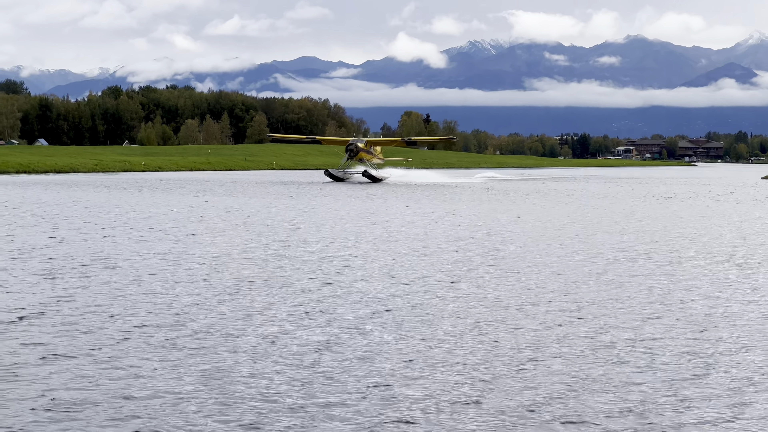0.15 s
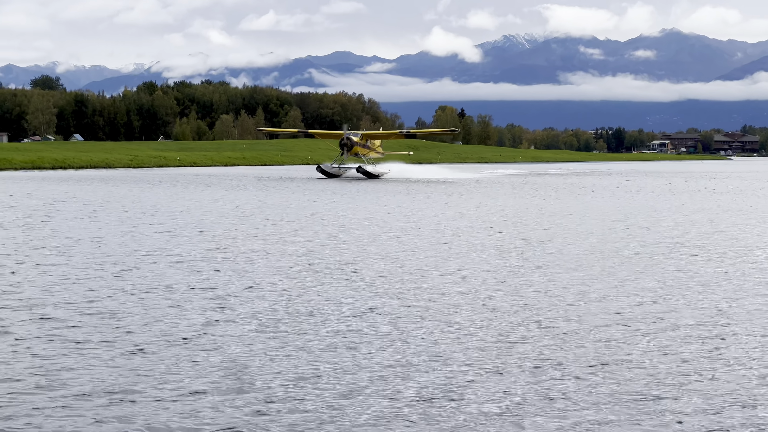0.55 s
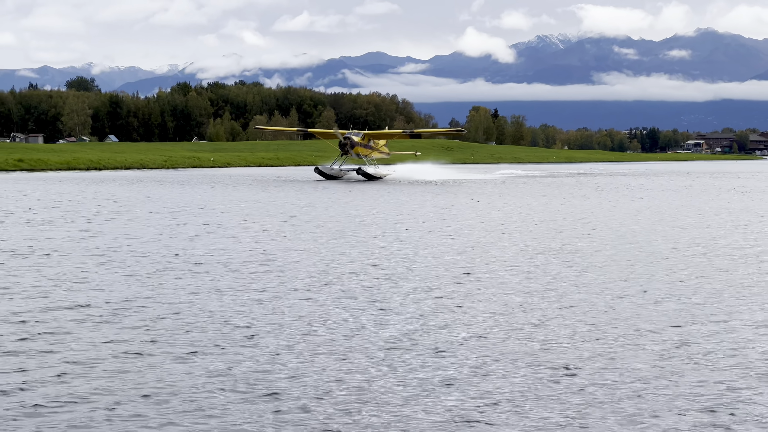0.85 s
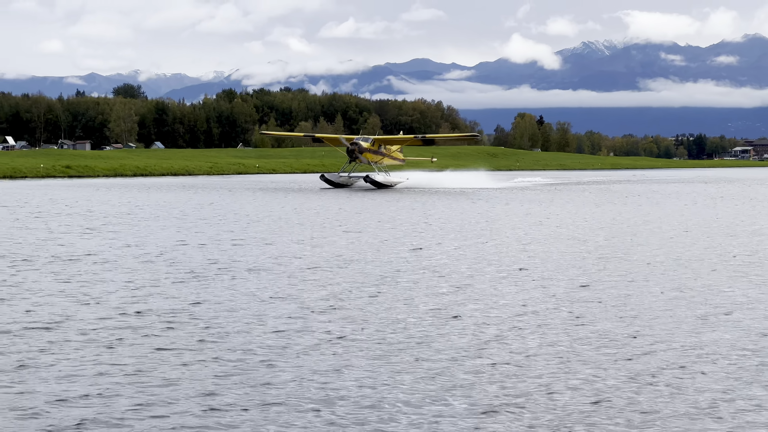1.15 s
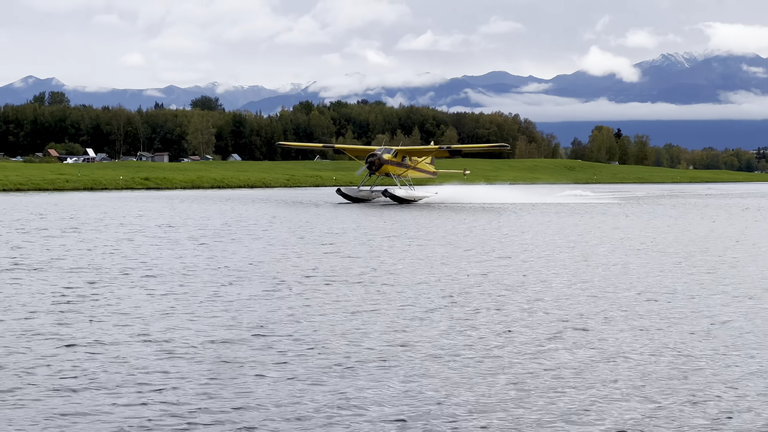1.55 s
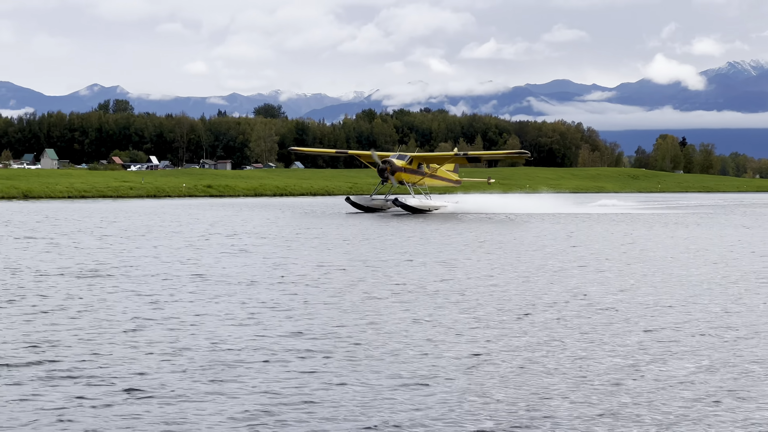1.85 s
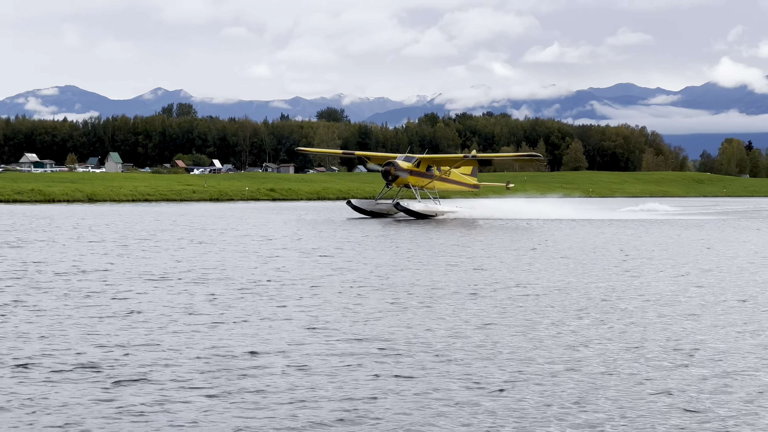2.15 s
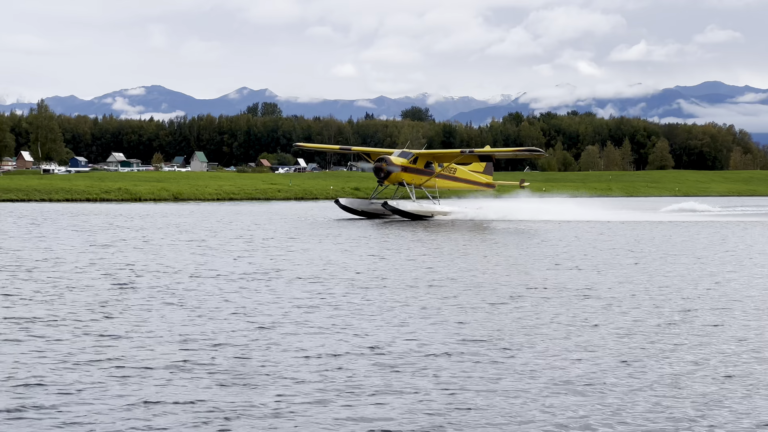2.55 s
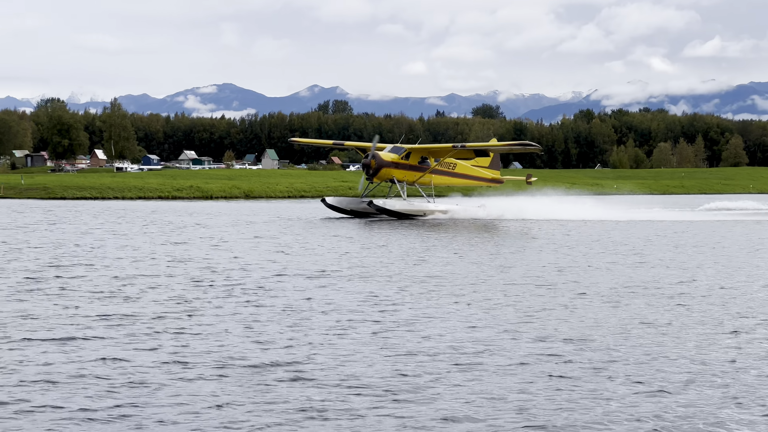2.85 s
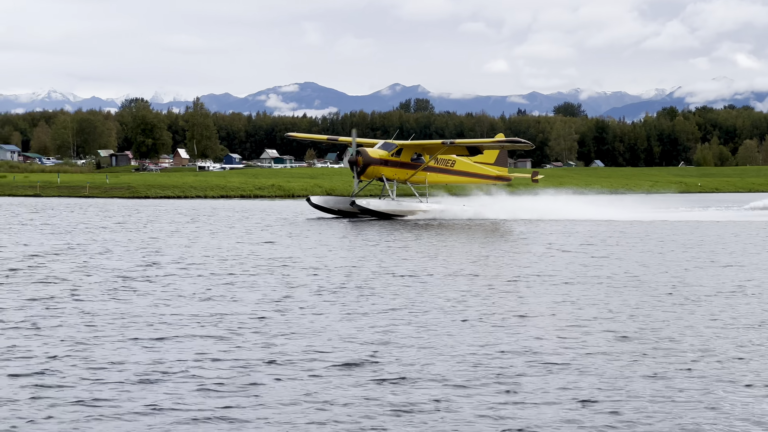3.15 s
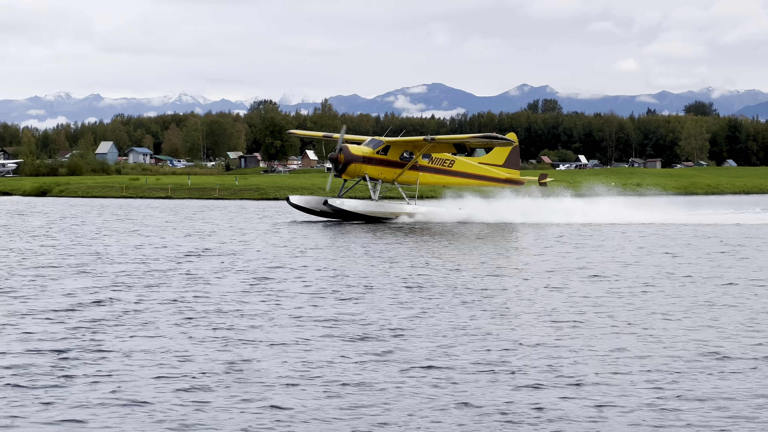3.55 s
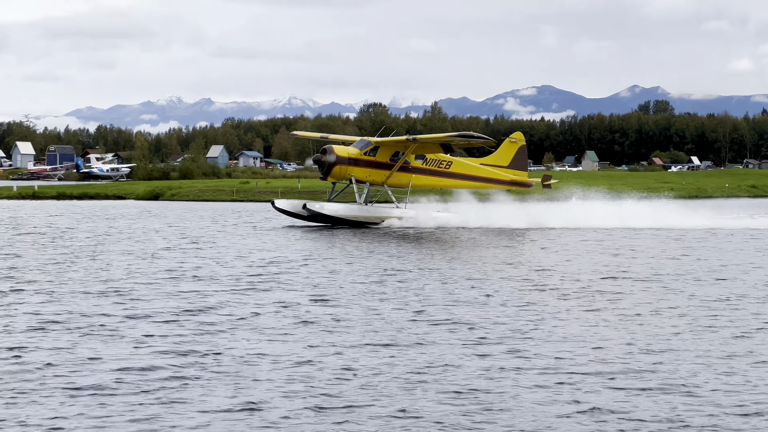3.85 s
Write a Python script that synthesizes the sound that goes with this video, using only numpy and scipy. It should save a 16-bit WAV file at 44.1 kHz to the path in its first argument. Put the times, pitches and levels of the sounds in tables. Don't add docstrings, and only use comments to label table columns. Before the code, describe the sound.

Outdoors by a lake, a floatplane's steady roar and falling propeller drone pass with hissing water spray; close wind rumble and flapping peak past the middle, then drop, with a few tiny handling ticks.

```python
import sys
import numpy as np
from scipy import signal
from scipy.fft import rfft, irfft
from scipy.io import wavfile
from scipy.ndimage import uniform_filter1d

SR = 44100
rng = np.random.default_rng(int(sys.argv[2]) if len(sys.argv) > 2 else 0)


def to_wav(sig):
    pcm = np.clip(np.atleast_2d(sig), -1, 1) * 32767
    pcm = np.round(pcm).astype(np.int16)
    wavfile.write(sys.argv[1], SR, pcm.T)


def level_to_linear(level):
    exponent = np.asarray(level, float) / 20
    return 10 ** exponent


N = 176400


def rms_one(x):
    return x / np.sqrt(np.mean(x ** 2) + 1e-20)


def in_time(rows):
    return np.interp(np.arange(N) / SR, *np.transpose(rows))


def at_hz(points, hz):
    table = np.array(points)
    return np.interp(np.log(hz), np.log(table[:, 0]), table[:, 1])


def drift(rate):
    r = np.exp(-80 * np.pi * rate / SR)
    steps = rng.standard_normal(N // 40 + 2002)
    slow = signal.lfilter([1], [1, -2 * r, r * r], steps)[2000:]
    return np.interp(np.arange(N) / 40, np.arange(len(slow)), rms_one(slow))


def bandpass(order, edges_hz):
    return signal.butter(order, edges_hz, "band", fs=SR, output="sos")


def lowpass(order, top_hz):
    return signal.butter(order, top_hz, fs=SR, output="sos")


def resonate(x, hz, width_hz, db):
    r = np.exp(-np.pi * width_hz / SR)
    feedback = [1, -2 * r * np.cos(2 * np.pi * hz / SR), r * r]
    return level_to_linear(db) * signal.lfilter([(1 - r * r) / 2, 0, (r * r - 1) / 2], feedback, x)


def clicks(per_s, spread_db):
    sizes = level_to_linear(spread_db * np.minimum(rng.exponential(1, N), 4)) * rng.choice([-1, 1], N)
    return rms_one(sizes * (rng.random(N) < per_s / SR))


# f/Hz, likeness/0-1
LIKENESS = [(60, 0.77), (300, 0.93), (600, 0.85), (1200, 0.98), (2600, 0.99), (5600, 0.84), (9000, 1),
            (12000, 0.73)]


def stereo(mid, side, hz):
    alike = np.clip(at_hz(LIKENESS, hz), 0, 1)
    return np.sqrt(1 + alike) * mid + np.sqrt(1 - alike) * side * [[1], [-1]]


def banded(spectrum, shared_db, own_db, rate, swing_db=0, grains=0):
    top_follows = 0.59
    run_in = 8000
    out, together = 0, 0.5 * drift(rate / 3) + 0.77 * drift(rate)
    octaves = np.log2(spectrum[-1][0] / spectrum[0][0])
    edges = spectrum[0][0] * 2 ** np.arange(0, octaves + 0.3, 1 / 3)
    shared_grains = np.pad(grains + np.zeros(N), (run_in, 0)) * [[1], [0]]
    white = rng.standard_normal((2, 2, N + run_in)) + shared_grains
    for k, (low, high) in enumerate(zip(edges, edges[1:])):
        mid, side = signal.sosfilt(bandpass(2, [low, high]), white[k % 2])[:, run_in:]
        hz = np.sqrt(low * high)
        tilt_db = swing_db * top_follows * max(np.log2(hz / 4500), 0)
        flicker_db = shared_db * together + own_db * drift(rate)
        out = out + level_to_linear(at_hz(spectrum, hz) + tilt_db + flicker_db) * stereo(mid, side, hz)
    return rms_one(out)


# t/s, f/Hz
BLADE = [(0, 96.85), (.8, 92.2), (1.3, 88.74), (1.8, 86.68), (2.4, 80.37), (3.15, 72.87), (3.6, 70.24),
         (4, 62.6)]
# t/s, level/dB
BLADE_LEVEL = [(0, -21), (.45, -18), (1.1, -15), (1.9, -19.5), (2.2, -16.5), (2.5, -20), (2.7, -29),
               (3, -33.5), (4, -34)]


def propeller():
    wobble_db, flutter_per_s = 1.4, 16
    wander_hz, wander_per_s = 0.4, 3.4
    pitch_hz = in_time(BLADE) + wander_hz * drift(wander_per_s)
    phase = 2 * np.pi * np.cumsum(pitch_hz) / SR
    level_db = in_time(BLADE_LEVEL) + wobble_db * drift(flutter_per_s)
    return np.sqrt(2) * level_to_linear(level_db) * np.sin(phase)


# t/s, level/dB
NEAR = [(0.0, -49.5), (0.01, -42), (0.02, -54), (0.38, -49), (0.57, -52), (0.79, -48), (0.96, -56.5),
        (1.06, -51.5), (1.37, -52), (1.39, -51), (1.86, -45.5), (2.33, -48), (2.48, -44.5), (3.72, -46),
        (3.81, -42), (4.0, -44)]


def nearness():
    return in_time(NEAR)


# f/Hz, level/dB (per Hz)
ROAR = [(120, 2.5), (350, 2), (470, -2.5), (620, -2), (1000, -6), (1680, -7.5), (2200, -14.5),
        (4500, -29.5)]
# t/s, level/dB
EFFORT = [(0.0, -34), (0.5, -34.5), (0.76, -31), (2.37, -33), (2.61, -31.5), (2.99, -36), (3.56, -35),
          (4.0, -35)]


def engine_roar(swing_db):
    follows, roar_db = 0.43, 4
    bursts = level_to_linear(-7) * clicks(300.0, 3.4)
    noise = banded(ROAR, shared_db=1.16, own_db=1.0, rate=33.0, grains=bursts)
    return level_to_linear(roar_db + in_time(EFFORT) + follows * swing_db) * noise


# f/Hz, level/dB (per Hz)
SPRAY = [(1500, -27.5), (3000, 3), (4000, -4), (5000, -7), (6200, -11), (8500, -13.5), (11000, -21),
         (15500, -29)]


def float_spray(near_db, swing_db):
    spray_db, drops_per_s, drops_db = 1.5, 1200, -11.5
    drops = level_to_linear(drops_db) * clicks(drops_per_s, 5.4)
    hiss = banded(SPRAY, shared_db=0.7, own_db=1.0, rate=16, swing_db=swing_db, grains=drops)
    return level_to_linear(spray_db + near_db) * hiss


# t/s, level/dB
WIND = [(0.0, -23), (0.33, -25.5), (0.39, -22), (0.42, -21.5), (0.78, -23.5), (0.91, -23.5), (1.8, -20.5),
        (2.23, -21), (2.49, -19), (2.75, -29.5), (2.76, -22.5), (2.93, -36), (3.92, -33.5), (4.0, -28.5)]
# f/Hz, level/dB (per Hz)
RUMBLE = [(22, -11.5), (34, -11.5), (50, -0.5), (70, 2.5), (110, -2.5), (230, -6), (400, -24.5),
          (800, -29.5)]


def wind_rumble():
    rumble_db, thumps_per_s, thumps_db = 3, 45, -7.5
    thumps = level_to_linear(thumps_db) * clicks(thumps_per_s, 2.7)
    noise = banded(RUMBLE, shared_db=0.0, own_db=2.0, rate=14.7, grains=thumps)
    return level_to_linear(rumble_db + in_time(WIND)) * noise


# t/s, left minus right level/dB
WIND_SIDE = [(0.0, -0.5), (0.11, -1), (2.56, 1.5), (3.4, -1), (3.53, -1.5), (3.88, -3), (4.0, 3.5)]


def from_side(wind):
    return wind * level_to_linear(in_time(WIND_SIDE) * [[0.5], [-0.5]])


def self_noise():
    hiss_db, band_hz = -72, (10700, 12600)
    return level_to_linear(hiss_db) * signal.sosfilt(bandpass(4, band_hz), rng.standard_normal((2, N)))


# t/s, length/s, level/dB, extra level in the finest ring/dB
TICKS = [(.002, 0.013, -69.5, 10.5), (.408, 0.01, -53, 2), (0.422, .005, -53, -3),
         (0.4345, 0.01, -50.5, -4), (1.06, 0.0044, -57.5, 5), (1.384, .003, -77.5, 16),
         (1.4, .003, -68, 18.5), (1.404, .003, -66, 19), (1.434, 0.0034, -48, -0.5),
         (2.022, 0.004, -57, 12), (2.89, .004, -61.5, 2)]
# f/Hz, width/Hz, level/dB
TICK_MODES = [(2400, 900, -9.5), (4000, 900, -7.5), (6900, 990, 7), (8300, 700, 0.5), (12300, 600, -15.5)]
# f/Hz, width/Hz, level/dB
FINE_RING = (14900, 1800, -16)


def ticks():
    burst, noise = np.full((2, N), 1e-18), rng.standard_normal(N)
    for s, length, db, fine_db in TICKS:
        a, n = int(s * SR), int(length * SR)
        level = level_to_linear(db + 11 + np.array([[0], [fine_db]]))
        burst[:, a:a + n] += level * noise[a:a + n] * np.exp(-1.5 * np.arange(n) / n)
    body = sum(resonate(burst[0], *mode) for mode in TICK_MODES)
    fine = resonate(resonate(burst[1], *FINE_RING), *FINE_RING[:2], 0)
    return body + fine


def ring_ports(rows, gain_db, cycles):
    soft_hz, length = 900, 4000
    out, t = np.zeros(N + length), np.arange(length) / SR
    signs = rng.choice([-1, 1], len(rows))
    for (s, db, hz), sign in zip(rows, signs):
        a = int(s * SR)
        fading = level_to_linear(db + gain_db - 60 * t * hz / cycles)
        out[a:a + length] += sign * fading * np.sin(2 * np.pi * hz * t)
    return signal.sosfilt(lowpass(2, soft_hz), out[:N])


# t/s, peak level/dB, f/Hz
SLAPS = [(0.128, -11, 205), (0.176, -27, 899), (0.174, -29, 258), (0.222, -17, 377), (0.248, -19, 202),
         (0.295, -13, 213), (0.366, -19, 221), (0.391, -22, 280), (0.487, -15, 210), (0.533, -12, 202),
         (0.702, -15, 202), (0.822, -19, 210), (0.855, -17.5, 221), (0.968, -17, 215), (1.023, -12, 318),
         (1.075, -15, 342), (1.119, -17, 202), (1.268, -24, 213), (1.35, -20.5, 250), (1.373, -18, 231),
         (1.474, -16, 202), (1.477, -10, 242), (1.522, -16, 202), (1.556, -23, 231), (1.579, -14, 234),
         (1.683, -21, 202), (1.761, -14, 202), (1.799, -18, 342), (1.834, -19, 202), (1.834, -10.5, 406),
         (1.89, -5.5, 237), (2.015, -5, 339), (2.104, -14, 240), (2.156, -20, 234), (2.246, -26, 266),
         (2.275, -14, 223), (2.298, -9, 202), (2.352, -6, 283), (2.38, -18, 223), (2.431, -12, 401),
         (2.47, -1.5, 336), (2.496, -10, 258), (2.656, -11, 202), (2.686, -9, 369), (2.707, -10, 466),
         (2.769, -10, 229), (2.85, -5.5, 326), (3.018, -28, 215), (3.465, -16, 326), (3.495, -23, 616),
         (3.525, -7, 256), (3.656, -24, 202), (3.775, -22, 266), (3.852, -16, 288), (3.898, -28, 264),
         (3.939, -18, 310)]


def slaps():
    return ring_ports(SLAPS, gain_db=-4, cycles=6)


# t/s, length/s, level/dB, top f/Hz
GUSTS = [(0.358, .07, -21.5, 96.7), (0.776, 0.013, -44, 960), (1.08, 0.009, -34.5, 1170),
         (1.533, 0.031, -35, 350), (1.686, 0.016, -23, 133), (1.763, 0.027, -30, 390),
         (1.819, 0.042, -22, 475), (1.806, 0.039, -14.5, 123), (2.287, 0.045, -25.5, 494),
         (2.352, 0.011, -28.5, 504), (2.384, 0.016, -21.5, 145.4), (2.418, 0.113, -15.5, 512),
         (2.426, 0.102, -16.5, 300), (2.529, 0.036, -24.5, 492), (2.54, 0.08, -17, 99.3),
         (2.643, 0.021, -28, 490), (2.679, 0.066, -22, 582), (2.752, 0.0625, -22.5, 670),
         (2.84, 0.015, -33.5, 580), (3.646, 0.043, -36.5, 346), (3.78, 0.28, -32, 418),
         (3.893, 0.01, -41, 308), (3.985, 0.02, -29, 300)]


def gusts():
    flaps_per_s = 620
    out, t = np.zeros((2, N)), np.arange(N) / SR
    flaps = np.array([clicks(flaps_per_s, 2.0), clicks(flaps_per_s, 2.1)])
    flaps = flaps + 1.28 * rng.standard_normal((2, N))
    for s, length, db, top_hz in GUSTS:
        a, b = int(s * SR), min(N, int((s + length + 0.023) * SR))
        shape = np.sin(np.pi * np.clip((t[a:b] - s) / length, 0, 1)) ** 0.47
        dull = np.vstack([bandpass(2, [0.38 * top_hz, top_hz]), lowpass(3, 1.31 * top_hz)])
        mid, side = signal.sosfilt(dull, flaps[:, a:b] * shape)
        level = level_to_linear(db) * np.sqrt((b - a) / (length * SR))
        out[:, a:b] += level * rms_one(mid + 0.2 * side * [[1], [-1]])
    return out


# t/s, half width/s, depth/0-1
EDDIES = [
    (0.471, 0.011, .6),
    (.57, 0.012, 0.6),
    (0.861, 0.013, 0.8),
    (.948, .018, 1),
    (1.53, 0.013, 0.96),
    (1.88, 0.0092, 0.8),
    (2.01, 0.014, 0.4),
    (2.081, 0.016, 0.1),
    (2.29, 0.021, .85),
]


def eddies():
    t = np.arange(N) / SR
    sags = [1 - min(depth, 1) * np.exp(-((t - s) / width) ** 2) for s, width, depth in EDDIES]
    return np.prod(sags, axis=0)


# t/s, peak level/dB, f/Hz
FLICKS = [(0.784, -18.5, 829), (1.08, -20, 1130), (2.354, -19, 570), (2.466, -9, 525), (2.71, -11, 525),
          (2.771, -18, 557), (2.799, -17, 571), (2.85, -22, 501), (2.939, -19, 856), (3.289, -21, 608),
          (3.494, -18, 620), (3.658, -15.5, 600), (3.777, -16, 732)]


def flicks():
    return ring_ports(FLICKS, gain_db=-1, cycles=9.5)


# t/s, f/Hz
TREBLE_EDGE = [(0, 9750), (.35, 10560), (.6, 9700), (.75, 10700), (.95, 9730), (1.5, 10840), (2.5, 11200),
               (4, 12300)]
# f/Hz, width/Hz, depth/0-1
WATER_DIPS = [(468, 33.5, 0.61), (1843, 66, 0.46), (5260, 570, 0)]


def carried(x):
    ragged_hz, loss_db_per_khz, most_loss_db = 250, 36.5, 11
    housing_hz, housing_width_hz, housing_gain = 6240, 490, 0.57
    hz, s, frames = signal.stft(x, SR, nperseg=1024, noverlap=768, boundary="even")
    hz = hz[:, None]
    ragged = ragged_hz * np.interp(s * SR, np.arange(N), drift(9.0))
    edge_hz = np.interp(s, *np.transpose(TREBLE_EDGE)) + ragged
    over_khz = np.maximum(hz - edge_hz, 0) / 1000
    loss_db = np.minimum(loss_db_per_khz * over_khz ** 2, most_loss_db)
    lift = 1 + housing_gain * np.exp(-((hz - housing_hz) / housing_width_hz) ** 2)
    for dip_hz, width_hz, depth in WATER_DIPS:
        lift = lift * (1 - depth * np.exp(-((hz - dip_hz) / width_hz) ** 2))
    return signal.istft(frames * lift * level_to_linear(-loss_db), SR, nperseg=1024, noverlap=768)[1][:, :N]


def scene():
    near_db = nearness()
    swing_db = near_db - near_db.mean()
    blown = eddies()
    plane = engine_roar(swing_db) + float_spray(near_db, swing_db)
    wind = from_side(wind_rumble() * np.sqrt(blown) + gusts() + slaps() + flicks())
    return propeller() * blown + carried(plane + wind) + ticks() + self_noise()


def gated(mid_side):
    gate_db, gate_from_hz = -18, 9500
    hz, _, frames = signal.stft(mid_side, SR, "cosine", nperseg=2048, noverlap=1024)
    power = uniform_filter1d(np.abs(frames) ** 2, size=16, axis=1)
    hiss = power[0, (hz > 8000) & (hz < 9000)].mean(axis=0)
    smooth_hiss = np.exp(uniform_filter1d(np.log(hiss + 1e-20), size=9))
    keep = np.repeat(power[:, 8::16] > smooth_hiss * level_to_linear(2 * gate_db), 16, axis=1)
    frames[:, :-1] *= keep | (hz[:-1, None] < gate_from_hz)
    return signal.istft(frames, SR, "cosine", nperseg=2048, noverlap=1024)[1][:, :N]


def roll_off(x):
    return signal.sosfilt(signal.butter(12, 15900, fs=SR, output="sos"), x)


# f/Hz, phase/radians
LEAD = [(800, 0), (2500, .2), (3300, .7), (5250, 0), (8600, 0), (9200, -1.7), (10250, -3.14),
        (12050, -6.28), (13700, -9.42), (15600, -12.2)]
# f/Hz, level/dB
BALANCE_DB = [(60, 0.0), (170, -0.44), (500, -0.5), (1450, -1.9), (4180, 0.0), (12100, 0.0)]
# low f/Hz, high f/Hz
CENTRED = [(5200, 8850), (11750, 12400)]
# low f/Hz, high f/Hz
OPPOSED = (9950, 10480)


def record(dry):
    low_cut_hz = 46
    padded = np.pad(dry, ((0, 0), (0, N // 10)), "reflect")
    hz = np.arange(padded.shape[1] // 2 + 1) * SR / padded.shape[1] + 1
    half = level_to_linear(at_hz(BALANCE_DB, hz) / 2) * np.exp(0.5j * at_hz(LEAD, hz))
    left, right = rfft(padded) * [half, 1 / half] / np.sqrt(1 + (low_cut_hz / hz) ** 6)
    mid = (left + right) / 2 * ((hz < OPPOSED[0]) | (hz > OPPOSED[1]))
    wide = np.prod([(hz < low) | (hz > high) for low, high in CENTRED], axis=0)
    side = (left - right) / 2 * wide
    mid, side = gated(irfft([mid, side]))
    ports = np.array([mid + side, mid - side])
    finished = 1.777 * np.tanh(ports / 1.808)
    return roll_off(finished)


dry = scene()
out = record(dry)
to_wav(out)
```